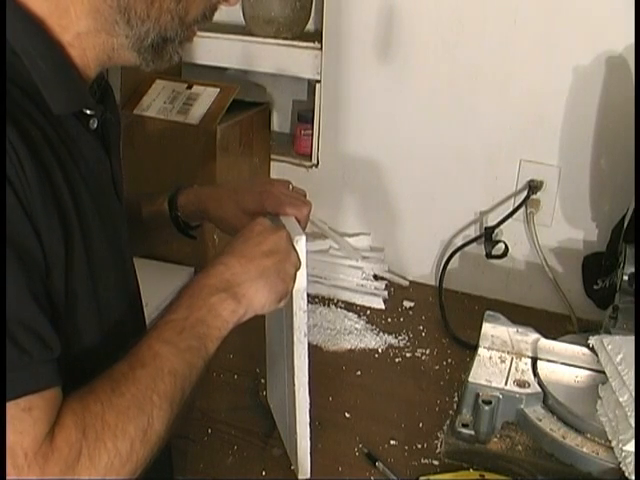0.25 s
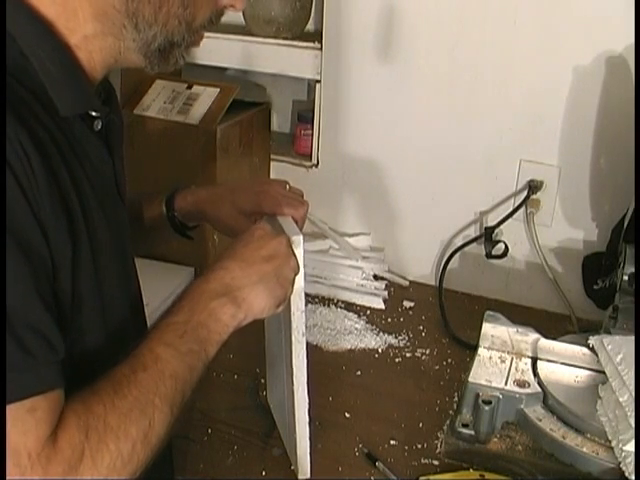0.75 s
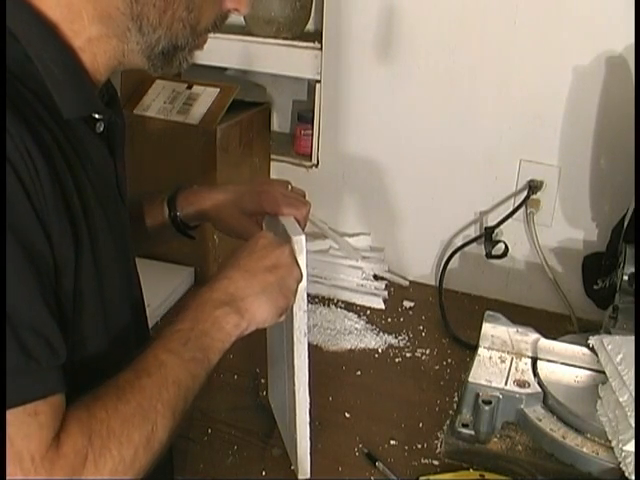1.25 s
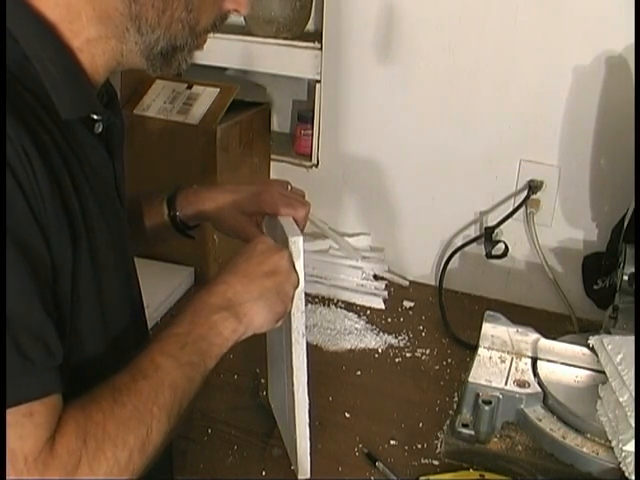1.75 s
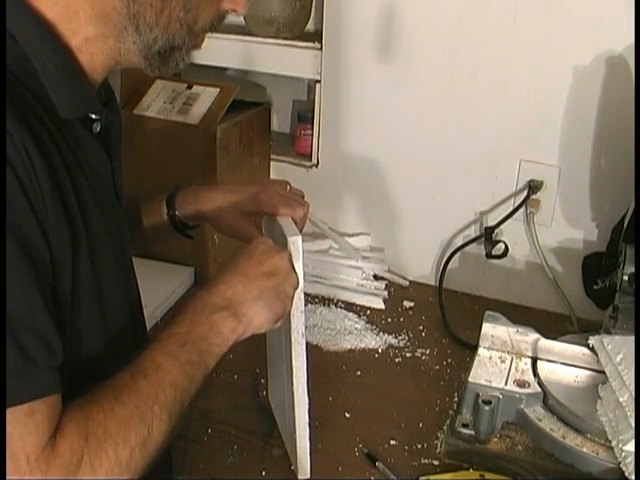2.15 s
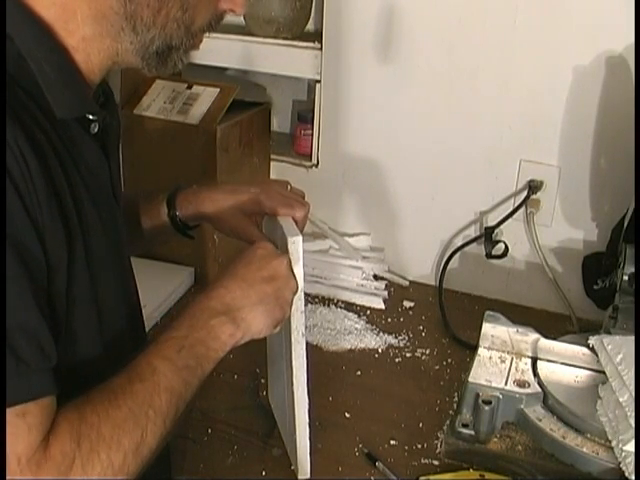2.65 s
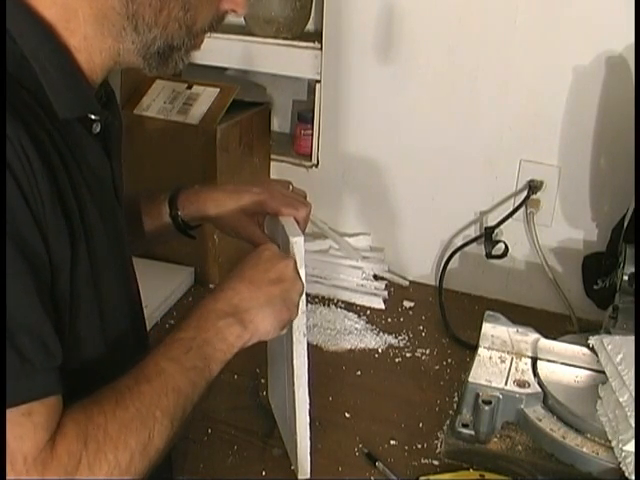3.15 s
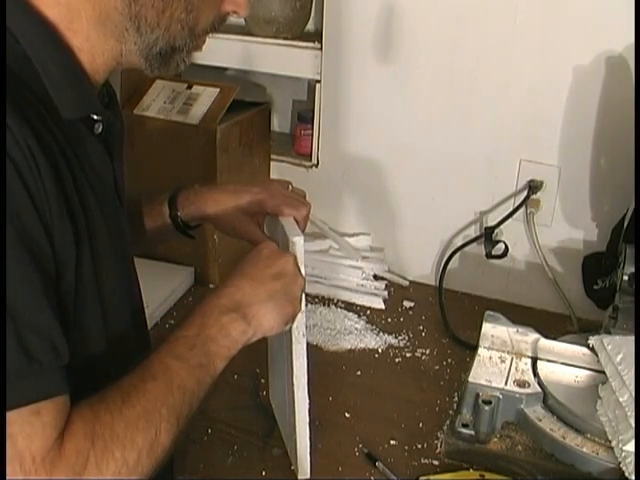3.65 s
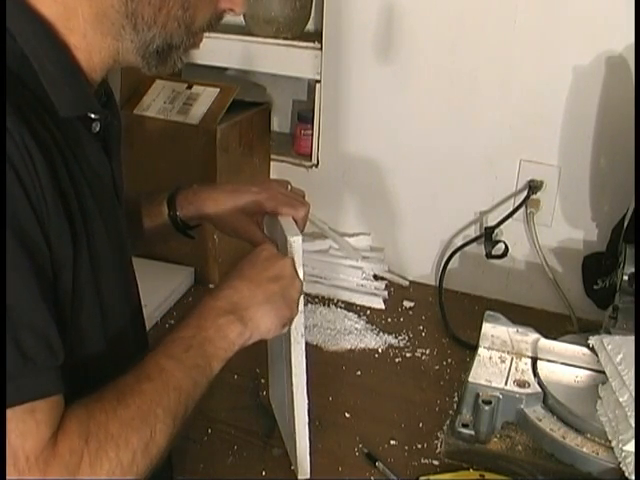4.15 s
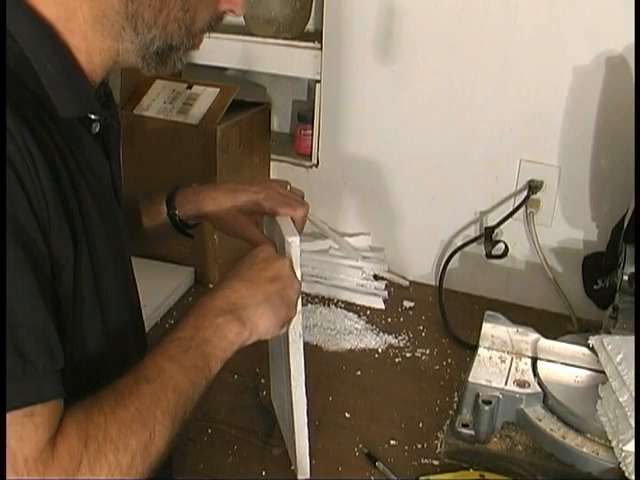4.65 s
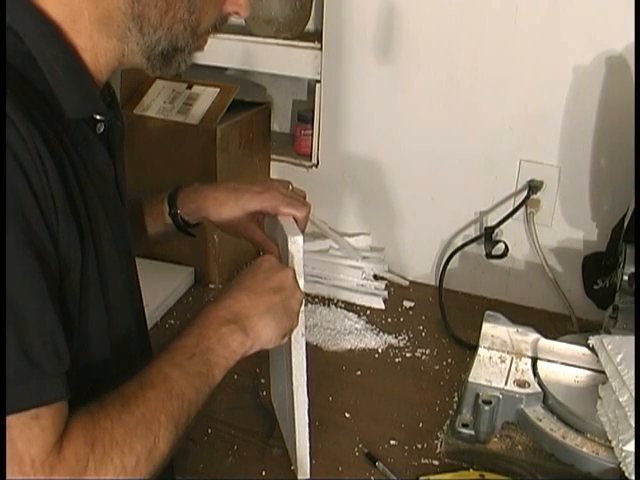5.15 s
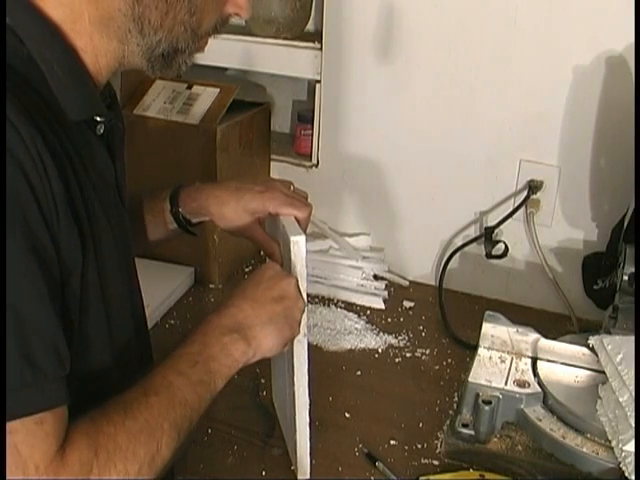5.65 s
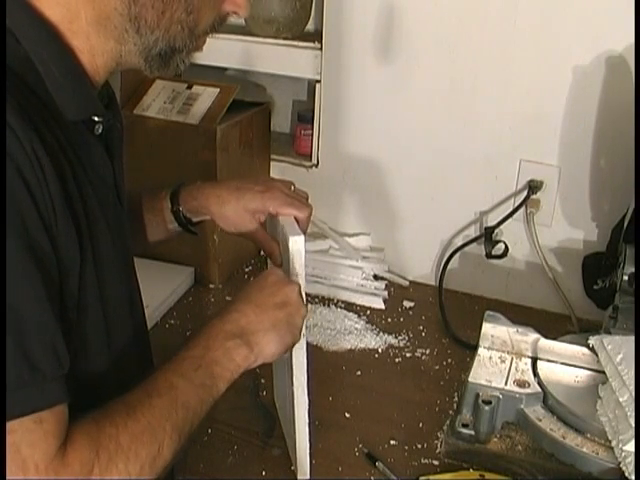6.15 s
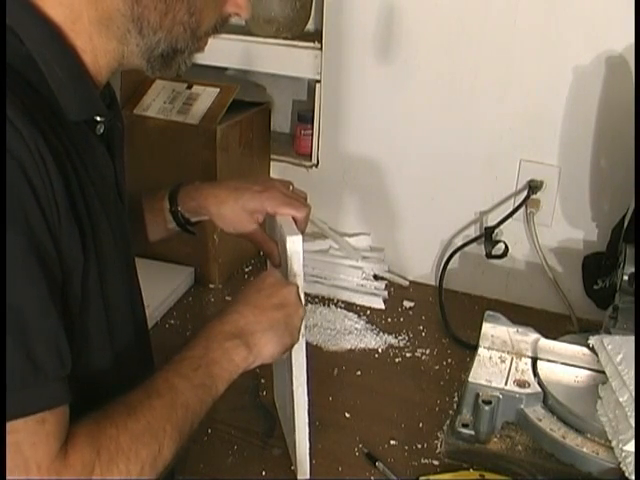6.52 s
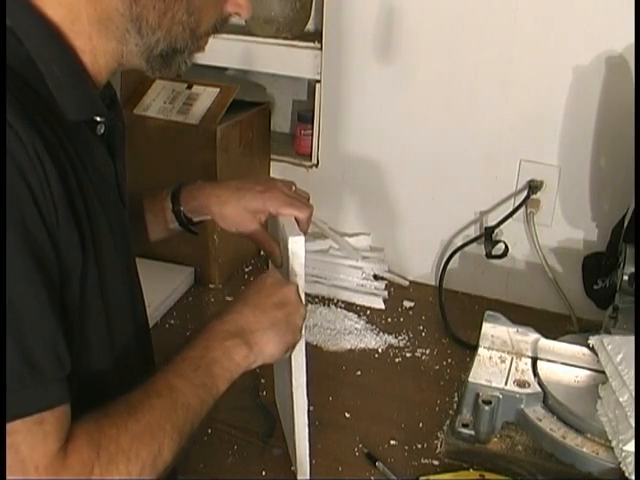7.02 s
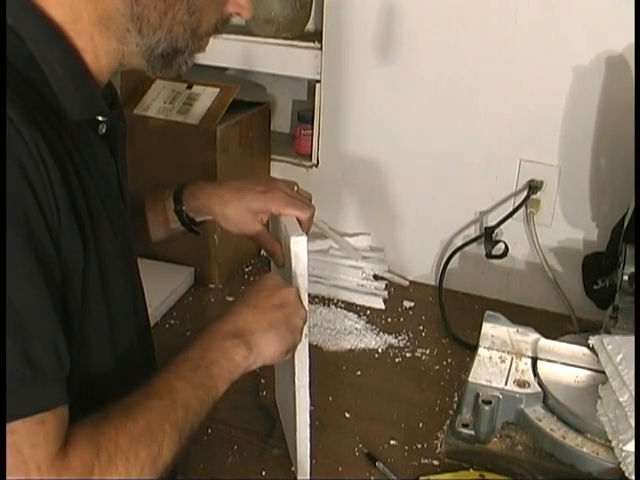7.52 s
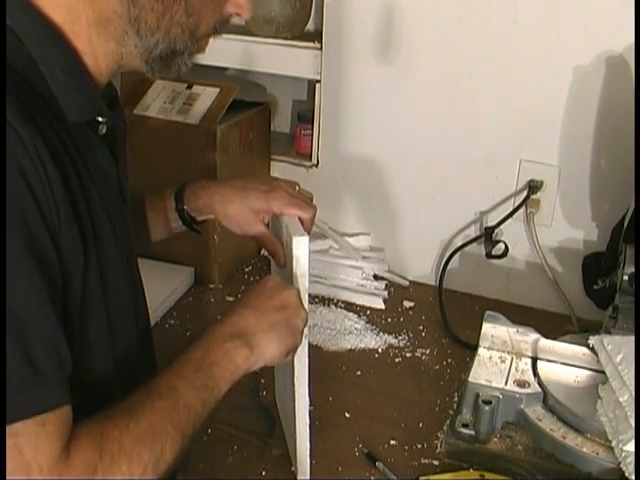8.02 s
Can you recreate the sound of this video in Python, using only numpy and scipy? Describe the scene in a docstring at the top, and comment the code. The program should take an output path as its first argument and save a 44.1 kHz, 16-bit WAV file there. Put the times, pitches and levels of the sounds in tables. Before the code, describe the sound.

Close up in a small, slightly live basement, quick back-and-forth sawing in foam runs without a break from start to end. The scratchy strokes are separated by tiny gaps with only faint crackle. Sharp ticks and crumbling bursts stand out, most strongly around two and a half, five and seven seconds. The bench booms softly; a quiet low hum continues, joined early by a low rising tone that fades.

```python
"""A thin knife saws back and forth through a foam sheet on a basement workbench: a dry rasp of tearing cells,
made of random clicks and noise, filtered and shaped by the blade's speed.
Snaps, chatter, squeaks and hollow knocks are short filtered noise bursts; each shove booms in the bench.
A motor hums faintly as a sine while a second low sine climbs and fades; filtered noise is the still air.
The room answers with early echoes and a decaying noise tail."""
import sys
import numpy as np
from scipy import signal
from scipy.fft import rfft, irfft, next_fast_len
from scipy.io import wavfile
from scipy.ndimage import uniform_filter1d, map_coordinates

SR = 44100
rng = np.random.default_rng(int(sys.argv[2]) if len(sys.argv) > 2 else 0)


def digitize_waveform(pressure):
    """Quantize a signal to 16-bit integers and store it at the path in sys.argv[1].

    Rows of a 2-D input are taken as channels; values are limited to [-1, 1].
    """
    field = np.atleast_2d(pressure).T
    bounded = np.clip(field, -1, 1)
    quanta = np.round(bounded * 32767).astype(np.int16)
    wavfile.write(sys.argv[1], SR, quanta)


N = 365085

# saw strokes: (start [s], length [s], rise [s], relative rasp level [dB], relative shove on the bench [dB])
SAW_STROKES = [(0, 0.0321, 0.003, -46, -59.5), (0.063, 0.1628, 0.0826, -31.5, -69),
               (0.292, 0.1529, 0.0419, -31, -58), (0.544, 0.1344, 0.107, -30, -64.5),
               (0.752, 0.1334, 0.0421, -29.5, -51), (0.979, 0.1183, 0.0146, -29, -49),
               (1.175, 0.1364, 0.0375, -31, -54), (1.382, 0.137, 0.0505, -30.5, -60),
               (1.595, 0.1347, 0.0304, -30.0, -50), (1.805, 0.1469, 0.0676, -31.0, -56),
               (2.035, 0.143, 0.0298, -31, -51), (2.239, 0.1638, 0.0597, -29.5, -67),
               (2.454, 0.1684, 0.0296, -30.5, -49), (2.718, 0.163, 0.0963, -31, -53),
               (2.932, 0.1646, 0.0775, -29.5, -53.5), (3.181, 0.1322, 0.0319, -29.0, -50),
               (3.387, 0.1894, 0.053, -29.0, -51), (3.616, 0.159, 0.0643, -30, -61),
               (3.84, 0.1555, 0.04, -30, -47.5), (4.058, 0.1957, 0.077, -31.0, -57.5),
               (4.278, 0.182, 0.0652, -30.5, -45.5), (4.513, 0.1875, 0.0254, -31.5, -57),
               (4.729, 0.188, 0.0547, -30.5, -49), (4.967, 0.1346, 0.0755, -30, -59.5),
               (5.166, 0.1652, 0.0653, -32, -56), (5.405, 0.1544, 0.039, -30.5, -53),
               (5.584, 0.1558, 0.0714, -30.0, -49.5), (5.806, 0.1655, 0.0519, -30, -49.5),
               (5.991, 0.2131, 0.068, -29.5, -48), (6.238, 0.1402, 0.0607, -29, -59),
               (6.439, 0.1292, 0.047, -29, -49), (6.614, 0.2025, 0.0996, -28.5, -54.5),
               (6.842, 0.1876, 0.0514, -28, -43), (7.029, 0.3698, 0.1405, -33, -52.5),
               (7.405, 0.1776, 0.0363, -30.5, -49.5), (7.641, 0.178, 0.075, -31.5, -55),
               (7.831, 0.2025, 0.0586, -30.0, -50), (8.064, 0.2325, 0.1183, -30.5, -58.5)]


def amp(db):
    """Decibels to gain."""
    return 10 ** (np.asarray(db) / 20)


def unit(x):
    """Scaled to rms 1."""
    return x / np.sqrt(np.mean(x ** 2) + 1e-20)


def along(points, hz):
    """(Hz, value) points joined on a log axis."""
    f, v = np.transpose(points)
    return np.interp(np.log(hz + 1), np.log(f + 1), v)


def bell(hz, centre_hz, width_hz):
    """A resonance's outline, 1 at its centre."""
    return 1 / (1 + (2 * (hz - centre_hz) / width_hz) ** 2)


def wobble(knots_per_s, size):
    """A smooth random curve through normal knots."""
    knots = rng.standard_normal(int(size * knots_per_s / SR) + 4)
    return map_coordinates(knots, [np.arange(size) * knots_per_s / SR])


def coloured(x, gain_db):
    """x through the causal minimum-phase filter whose gain is gain_db(Hz)."""
    size = x.shape[-1]
    m = 2 * next_fast_len(size // 2 + 2048)
    cepstrum = irfft(np.log(amp(gain_db(np.fft.rfftfreq(m, 1 / SR)))))
    # folding the cepstrum onto positive time gives minimum phase
    cepstrum[1:m // 2] *= 2
    cepstrum[m // 2 + 1:] = 0
    response = np.exp(rfft(cepstrum))
    return irfft(rfft(x, m) * response, m)[..., :size]


def add(track, start_s, sound):
    """Mixes a sound into a track from start_s."""
    part = track[max(round(start_s * SR), 0):][:len(sound)]
    part += sound[:len(part)]


def foam_db(hz):
    """The sheet's colour; its resonances shift a little each time, as the hand and the cut move."""
    # tearing foam: (frequency [Hz], relative level [dB])
    tearing_colour = [(100, -26), (250, -22), (400, -17.5), (550, -19.5), (800, -18), (950, -9), (1500, -8),
                      (2500, -3.5), (4300, -1), (5500, 0), (8000, -0.5), (9500, -3), (11000, -7.5),
                      (13500, -6), (15500, -18.5)]
    # resonances of sheet and blade: (centre [Hz], width [Hz], mean lift [dB])
    resonances = [(367, 38, 5.5), (660.6, 33.4, 7), (961, 39, 1), (1100.6, 26, 2), (1237, 20.3, 3.5),
                  (1710, 82, 4.5), (1968, 186.6, 7), (2107.3, 160, 5.5), (3410, 117, 0.5), (4953, 139, 3.5),
                  (5291, 260, 6), (5926, 193, 4.5), (7540, 387, 4)]
    lift_spread_db, relative_shift = 1.98, 0.0178
    colour_db = along(tearing_colour, hz)
    for centre_hz, width_hz, mean_lift_db in resonances:
        shift, lift = rng.standard_normal(2)
        shape = bell(hz, centre_hz * (1 + relative_shift * shift), width_hz)
        colour_db = colour_db + (mean_lift_db + lift_spread_db * lift) * shape
    return colour_db


def tearing(size, cells_per_s, rub, clump_db, beads_per_s):
    """Cell walls burst as tiny clicks over the smooth rub of the blade's flank; the level clumps bead by bead."""
    bursts = (rng.random(size) < cells_per_s / SR) * rng.choice([-1., 1.], size)
    clumps = amp(clump_db * wobble(beads_per_s, size))
    return (unit(bursts) + rub * rng.standard_normal(size)) * clumps


def speed(length_s, rise_s, slowing_share=0.333):
    """The blade's relative speed through one stroke: it bites, runs and slows to the turn."""
    t = np.arange(int(length_s * SR)) / SR
    bite = np.sin(np.pi / 2 * np.clip(t / rise_s, 0, 1)) ** 2
    slowing = np.sin(np.pi / 2 * np.clip((1 - t / length_s) / slowing_share, 0, 1)) ** 2
    return bite * slowing


def pressure(rise_s=0.0106, fade_s=0.0402):
    """Gain of the rasp: it surges as the blade jams and tears through, then eases as the foam gives way."""
    # jams: (time [s], surge before the rise and fade [dB])
    jams = [(0.356, 6), (1.652, 1.5), (2.53, 4), (4.802, 8.5), (5.643, 3), (6.087, 10), (6.92, 4)]
    t = np.arange(N) / SR
    surge_db = np.zeros(N)
    for jam_s, db in jams:
        rise = np.clip((t - jam_s) / rise_s, 0, 1)
        surge_db += db * rise * np.exp(-((t - jam_s) / fade_s) ** 2)
    return amp(surge_db)


def sawing(scrape_db=4.0, angle_db=0.7566):
    """Each stroke tears cells as loudly as the blade is fast; the harder it shoves, the fuller the rasp."""
    average_shove_db, flex_per_shove = -52, 0.088  # a pushed sheet flexes: dB of low rasp per dB of shove
    mean_scrape_hz, scrape_spread = 6063, 0.213  # spread in natural-log pitch
    out = np.zeros(N)
    for start_s, length_s, rise_s, db, shove_db in SAW_STROKES:
        motion = speed(length_s, rise_s)
        size = len(motion)
        travel = np.linspace(0, 1, size)
        # the blade's angle and depth change the colour from stroke to stroke
        body, sheet, fizz = angle_db * rng.standard_normal(3)
        flex = flex_per_shove * (shove_db - average_shove_db)
        angle = [(600, body + 0.52), (1000, sheet + flex), (2200, sheet + flex),
                 (3000, 0.0017), (8500, 0.0045), (11500, fizz - .8)]
        scrape_hz = mean_scrape_hz * np.exp(scrape_spread * rng.standard_normal())

        def colour_db(hz):
            return foam_db(hz) + along(angle, hz) + scrape_db * bell(hz, scrape_hz, width_hz=464)

        cells = tearing(size, cells_per_s=6000, rub=0.518, clump_db=0.4657, beads_per_s=450)
        # the resonances drift as the contact travels along the blade: a crossfade of two colours
        early = coloured(cells, colour_db)
        late = coloured(cells, colour_db)
        rasp = unit((1 - travel) * early + travel * late)
        judder = amp(0.696 * wobble(62.34, size))  # the foam resists unevenly
        add(out, start_s, amp(db) * rasp * motion * judder)
    return amp(0.5971) * out * pressure()


def flank(rub_db=-60, uneven_db=4.0):
    """Even at the turns the pinched blade shifts a little and crackles faintly."""
    cells = tearing(N, cells_per_s=900, rub=0.32, clump_db=1.0, beads_per_s=150)
    level = amp(rub_db + uneven_db * wobble(14, N))
    return level * unit(coloured(cells, foam_db))


def bench(swell_s=0.033, peak_share=0.575):
    """Just past mid-stroke the sheet's foot shoves the bench top, which answers with a dull boom."""
    # bench top: (frequency [Hz], relative level [dB])
    bench_colour = [(30, -28.5), (60, -7.5), (80, 8), (93, 2), (112, -13.5), (135, -11.5), (220, -17),
                    (400, -36.5), (900, -69.5)]
    t = np.arange(N) / SR
    shove = np.zeros(N)
    for start_s, length_s, _, _, shove_db in SAW_STROKES:
        peak_s = start_s + peak_share * length_s
        shove += amp(shove_db) * np.exp(-((t - peak_s) / swell_s) ** 2 / 2)
    boom = coloured(rng.standard_normal(N), lambda hz: along(bench_colour, hz))
    # dividing by the local rms lets the shove alone set how loud each boom is
    local_rms = np.sqrt(np.abs(uniform_filter1d(boom ** 2, size=SR // 16)) + 1e-20)
    return amp(3.5) * shove * boom / local_rms


def background(hum_db=-49.0, air_db=-55, apart=0.65):
    """A steady-pitched motor hum and a climbing tone, both sines, over the faint noise of still air."""
    # climbing tone: (time [s], relative level [dB])
    climb_levels = [(0, -69), (.6, -50.5), (2.05, -45), (2.35, -54.5), (2.8, -52), (3.6, -83)]
    # still air of the basement: (frequency [Hz], relative level [dB])
    air_colour = [(15, -17), (35, 0.5), (48, -7.5), (70, -4), (110, -5), (160, -5.5), (280, -15.5),
                  (600, -20.5), (1500, -19.5), (4000, -23), (10000, -37), (15000, -56)]
    hum_hz, climb_start_hz, climb_hz_per_s = 58.6, 38.7, 4.4
    t = np.arange(N) / SR
    hum = amp(hum_db + 1.15 * wobble(2.677, N)) * np.sin(2 * np.pi * hum_hz * t)
    climb_hz = climb_start_hz + climb_hz_per_s * t
    climb_gain = amp(np.interp(t, *np.transpose(climb_levels)))
    climb = climb_gain * np.sin(2 * np.pi * np.cumsum(climb_hz) / SR)
    mid, side = coloured(rng.standard_normal((2, N)), lambda hz: along(air_colour, hz))
    # long waves reach both sides more alike
    side = apart * coloured(side, lambda hz: along([(60, -7.5), (300, -1)], hz))
    air = amp(air_db) * unit(np.array([mid + side, mid - side]))
    return (hum + climb + air) * amp([[-1], [1]])  # left, right dB


def echoes(wall_db=-9, count=10):
    """Bench and near walls echo within milliseconds; then the room dies away, differently on each side."""
    # room decay: (frequency [Hz], t60 [s])
    room_decay = [(100, 0.362), (500, 0.418), (2000, 0.312), (6000, 0.285), (10000, 0.2675),
                  (15000, 0.0954)]
    hz, t, z = signal.stft(rng.standard_normal((2, SR // 2)), SR, nperseg=256)
    decay = amp(-60 * t / along(room_decay, hz)[:, None])
    tail = signal.istft(z * decay, SR, nperseg=256)[1]
    delay = int(.004 * SR)
    tail = np.pad(tail / np.linalg.norm(tail[0]), ((0, 0), (delay, 0)))
    for side in tail:
        places = (rng.uniform(.001, .009, count) * SR).astype(int)
        np.add.at(side, places, amp(wall_db) * rng.choice([-1, 1], count) / np.sqrt(count))
    return tail


def basement(x, count=5):
    """The echoes change slowly as the cut and the arms move: a crossfade through several responses."""
    # reverberation: (frequency [Hz], relative level [dB])
    wet_colour = [(70, -19.5), (150, -6), (450, 1), (900, 0), (2000, -6), (3000, -1.5), (5500, -6.5),
                  (9000, -6), (14000, -0.5)]
    place = np.linspace(0, count - 1, N)
    wet = np.zeros((2, N))
    for k in range(count):
        share = np.cos(np.pi / 2 * np.clip(place - k, -1, 1))
        wet += signal.oaconvolve((x * share)[None], echoes(), axes=1)[:, :N]
    return coloured(wet, lambda hz: along(wet_colour, hz))


def crack(t60, ring_hz, width_hz, ring_db):
    """A short burst in the foam that rings the blade; rms about 1 at its start, t60 in s."""
    t = np.arange(SR // 20) / SR
    noise = rng.standard_normal(len(t))
    burst = coloured(noise, lambda hz: foam_db(hz) + ring_db * bell(hz, ring_hz, width_hz))
    return unit(burst) * amp(-60 * t / t60)


def catches(count=4):
    """Hard beads snap with a sharp tick and crumble on; a sticking, slipping blade chatters at its own pitch."""
    # beads that catch on the blade: (time [s], relative level [dB])
    snaps = [(.362, -22.5), (1.66, -24), (2.5326, -15.5), (4.403, -23), (4.871, -18.5), (5.6513, -22.5),
             (6.094, -24), (6.5714, -32), (6.65, -31), (6.885, -21), (6.927, -24), (7.078, -30),
             (7.5019, -20), (7.933, -21), (8.0217, -25.5), (8.0287, -29)]
    chatter_s, chatter_gap_s, chatter_db = 6.5815, 0.0081, -31  # just after one stroke; relative dB
    out = np.zeros(N)
    for snap_s, db in snaps:
        tick = crack(t60=0.0084, ring_hz=11000, width_hz=6500, ring_db=10)
        crumble = crack(t60=0.0486, ring_hz=6020, width_hz=1200, ring_db=3.5)
        add(out, snap_s, amp(db) * (tick + amp(-2) * crumble))
    for k in range(count):
        slip = crack(t60=0.0288, ring_hz=6320, width_hz=1070, ring_db=16.5)
        add(out, chatter_s + k * chatter_gap_s, amp(chatter_db) * slip)
    return out


def squeaks(swell_s=0.0178, width_hz=330):
    """Smooth steel drags over the beads in the slit; its slips briefly fall into a rough pitch."""
    # squeaks: (centre time [s], pitch [Hz], relative level [dB])
    squeak_events = [(.39, 4160, -34), (3.251, 4770, -38), (3.431, 5810, -37), (5.875, 3290, -36.5),
                     (7.73, 2092, -41)]
    out = np.zeros(N)
    t = np.arange(SR // 8) / SR
    swell = np.exp(-((t - t.mean()) / swell_s) ** 2 / 2)
    for centre_s, pitch_hz, db in squeak_events:
        noise = rng.standard_normal(len(t))
        slips = coloured(noise, lambda hz: 20 * np.log10(bell(hz, pitch_hz, width_hz) + 1e-6))
        add(out, centre_s - t.mean(), amp(db) * swell * unit(slips))
    return out


def knocks(t60=0.0875, attack_s=0.00505, hollow_db=12):
    """The blade bites hard and the whole sheet flexes: a soft, hollow noise burst, resonant at one pitch."""
    # knocks: (time [s], relative level [dB], pitch [Hz])
    knock_events = [(0.991, -46.5, 346), (3.2, -45.5, 340), (4.53, -44.5, 335), (4.812, -44, 141),
                    (5.42, -47.5, 300), (6.095, -48, 214.5), (6.54, -48.5, 217), (7.94, -50, 141)]
    # flexing sheet: (frequency [Hz], relative level [dB])
    flex_colour = [(80, -7), (170, -4), (350, -7.5), (480, -9.5), (680, -10.5), (1050, -2.5), (1380, 3),
                   (1700, -7.5), (3000, -39.5)]
    out = np.zeros(N)
    t = np.arange(SR // 5) / SR
    envelope = amp(-60 * t / t60) * (1 - np.exp(-t / attack_s))
    for knock_s, db, pitch_hz in knock_events:
        noise = rng.standard_normal(len(t))
        flex = coloured(noise, lambda hz: along(flex_colour, hz) + hollow_db * bell(hz, pitch_hz, width_hz=59))
        add(out, knock_s, amp(db - 5.0) * unit(flex * envelope))
    return out


def scene():
    """The work is a little to the right; the sheet's face throws its low notes to the left."""
    # stereo lean: (frequency [Hz], left minus right [dB])
    lean = [(130, -2), (260, 1.5), (600, 6), (1000, 1), (2500, -3), (4000, -1.17), (9000, -1.11),
            (14000, 1)]
    work = sawing() + flank() + bench() + catches() + squeaks() + knocks()
    left, right = work + amp(-.5) * basement(work)
    left = coloured(left, lambda hz: along(lean, hz) / 2)
    right = coloured(right, lambda hz: -along(lean, hz) / 2)
    return amp(-0.4481) * np.array([left, right]) + background()


def record(dry, top_hz=15100):
    """Nothing passes from the band limit up."""
    m = next_fast_len(N + SR // 2)
    passed = np.fft.rfftfreq(m, 1 / SR) < top_hz
    return irfft(rfft(dry, m) * passed, m)[:, :N]


dry = scene()
out = record(dry)
digitize_waveform(out)
```